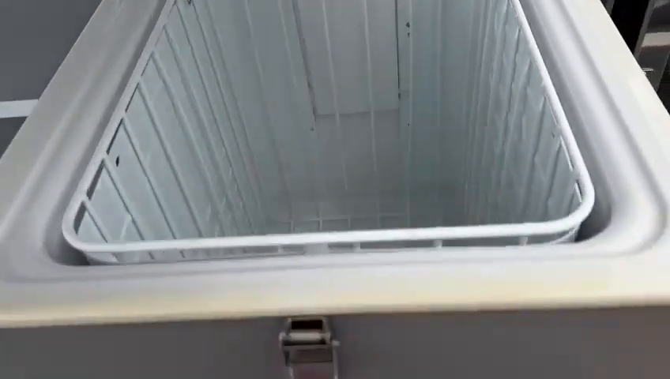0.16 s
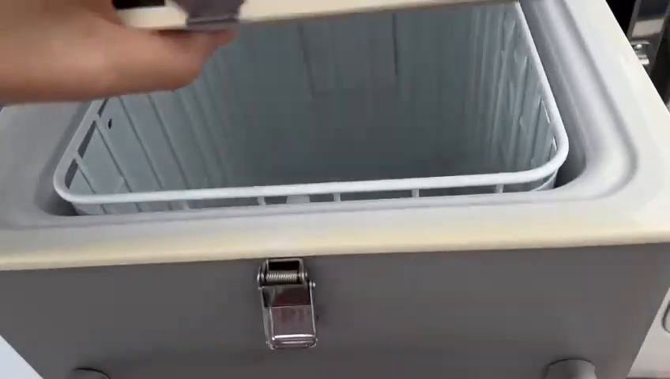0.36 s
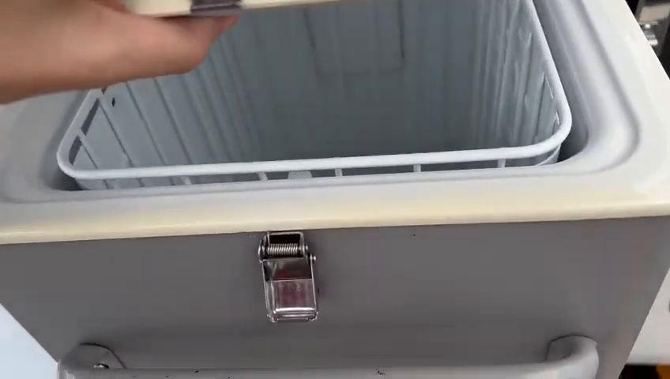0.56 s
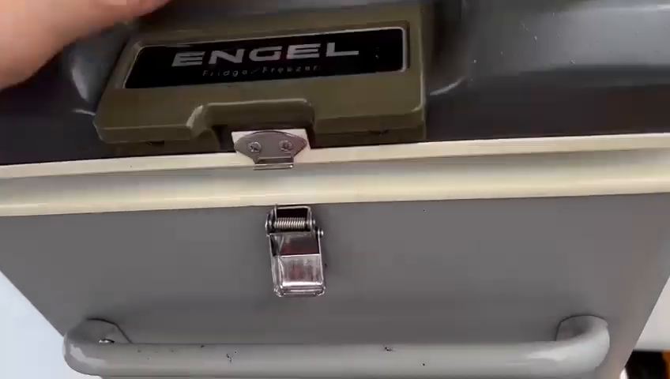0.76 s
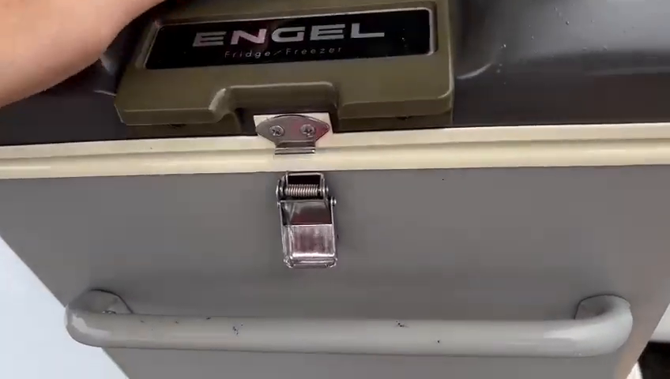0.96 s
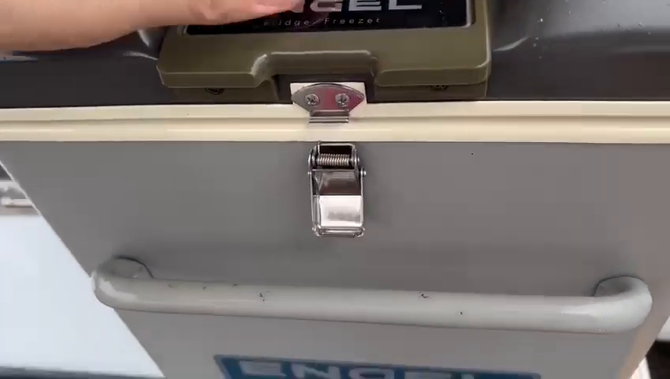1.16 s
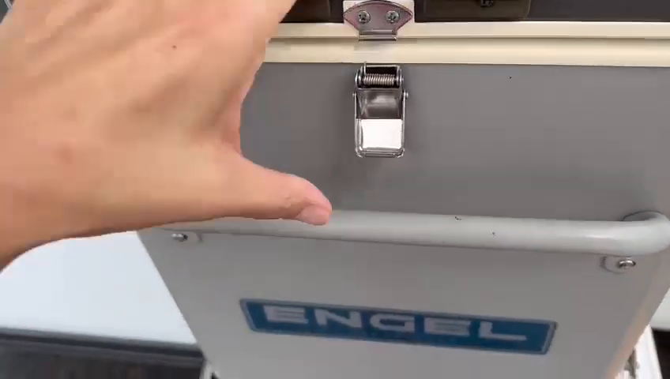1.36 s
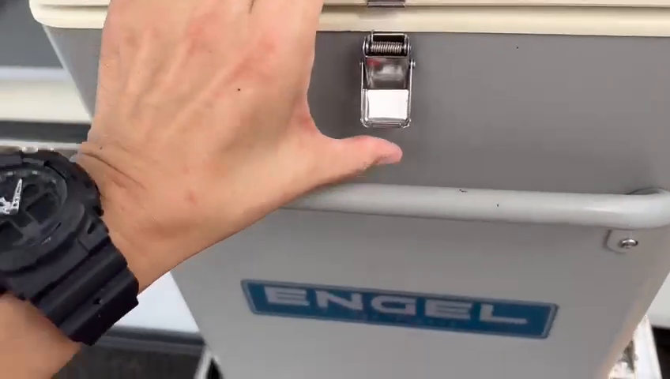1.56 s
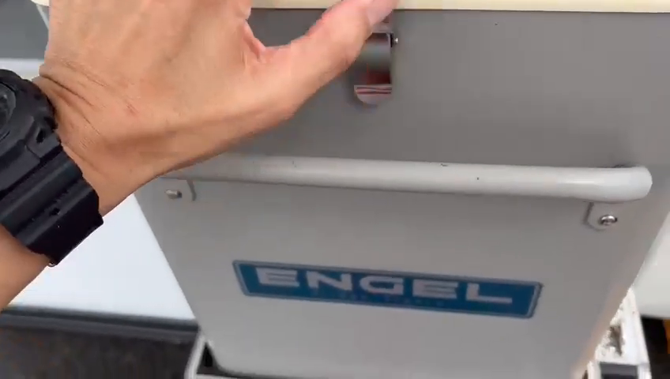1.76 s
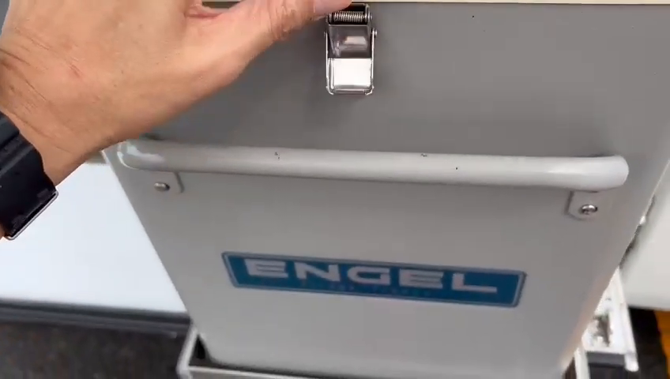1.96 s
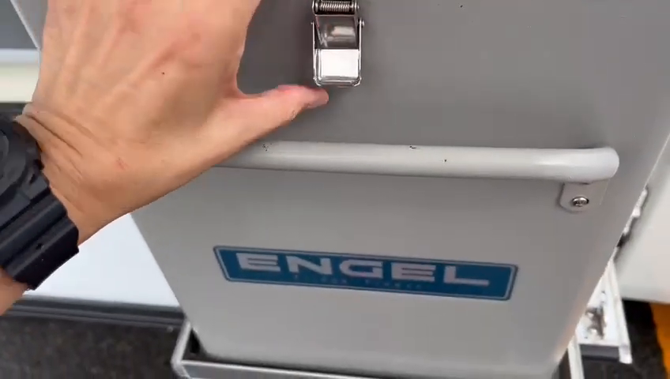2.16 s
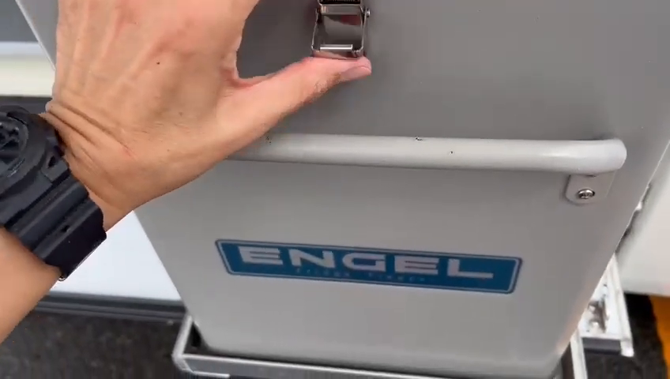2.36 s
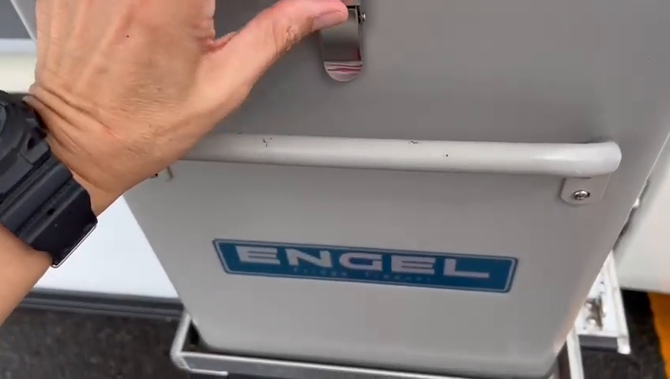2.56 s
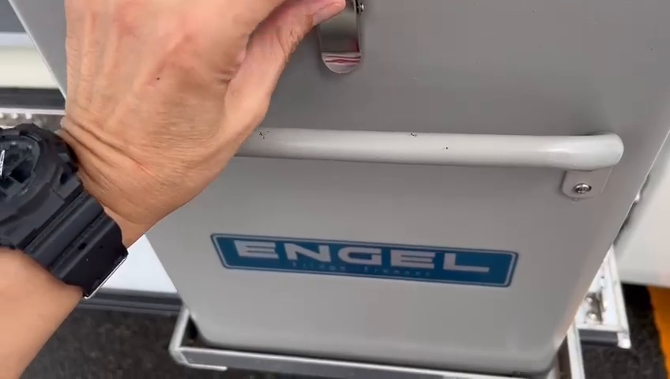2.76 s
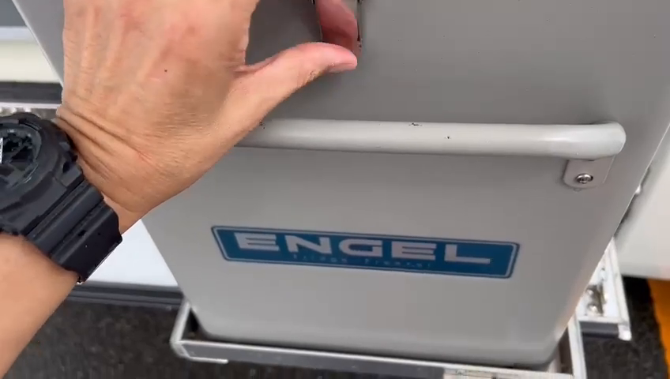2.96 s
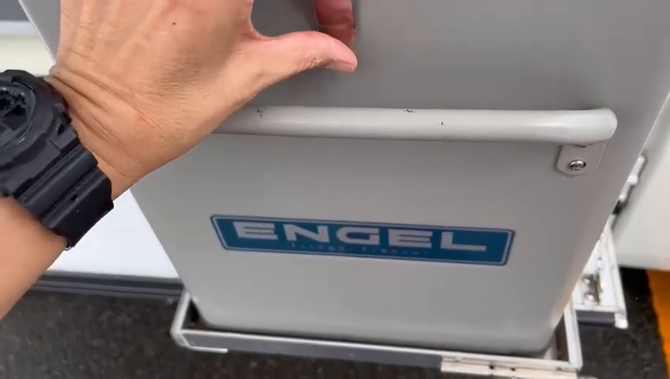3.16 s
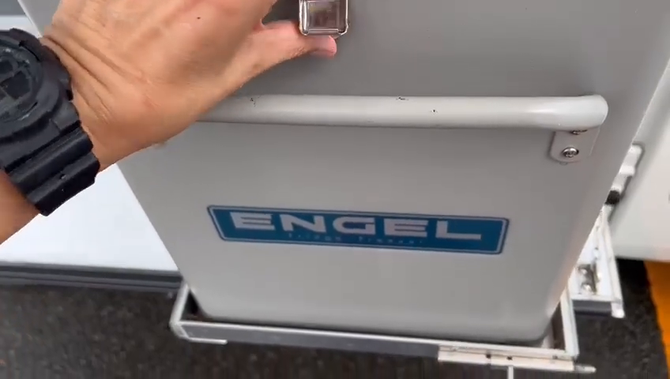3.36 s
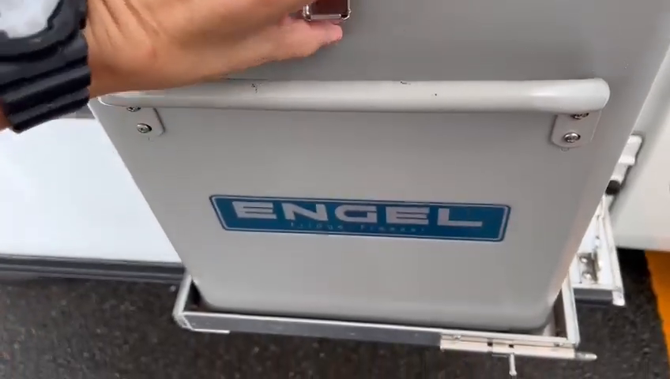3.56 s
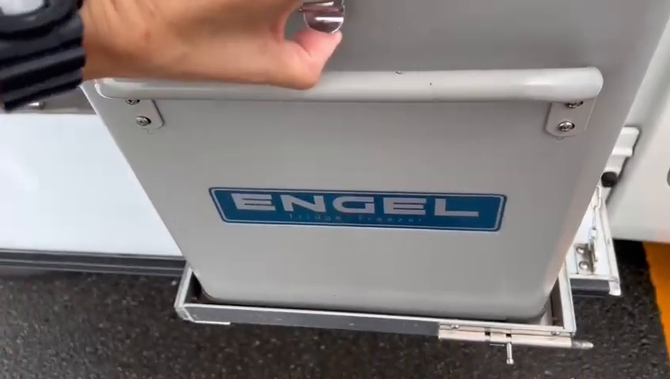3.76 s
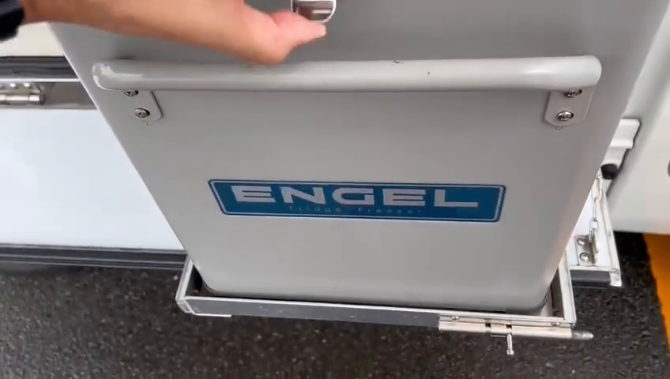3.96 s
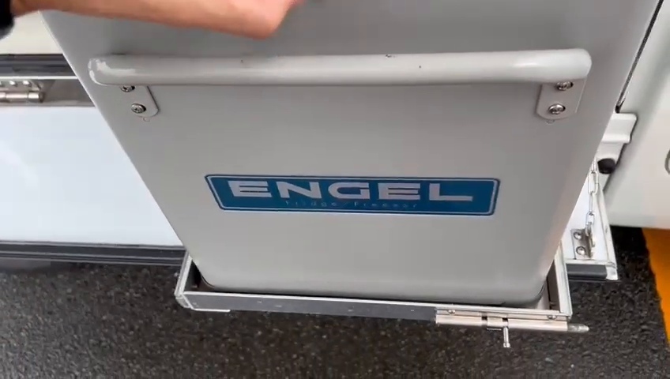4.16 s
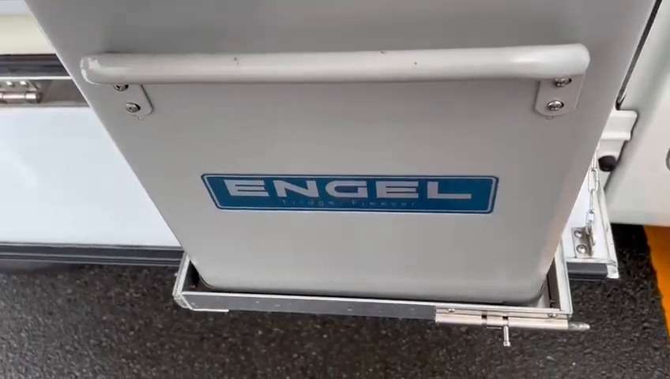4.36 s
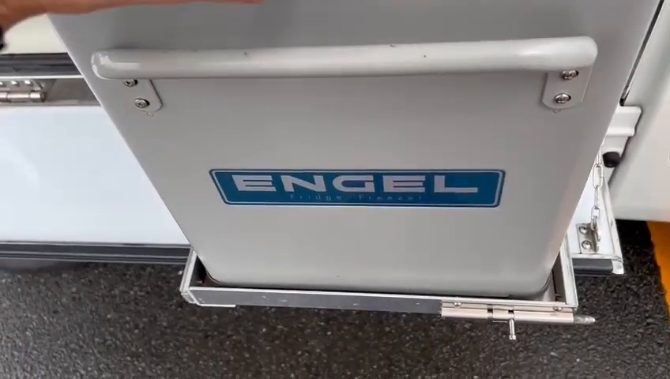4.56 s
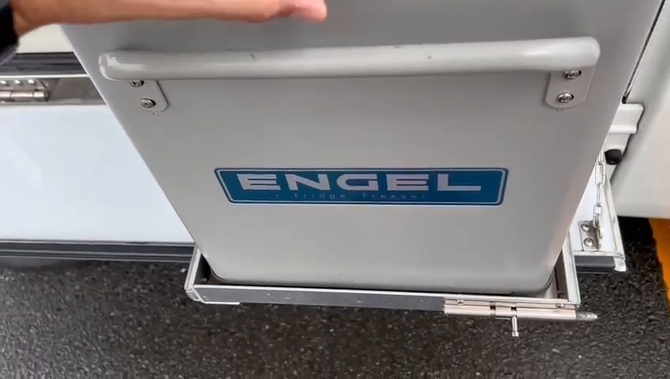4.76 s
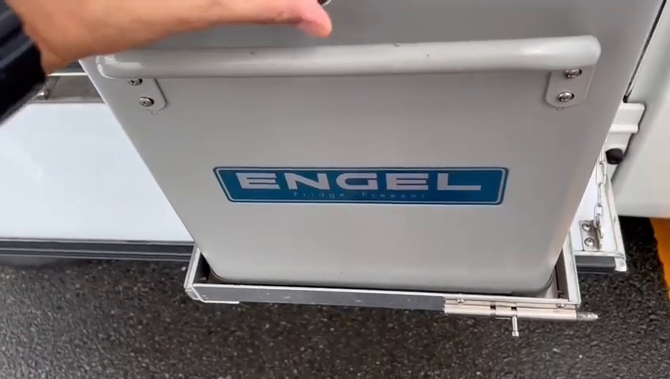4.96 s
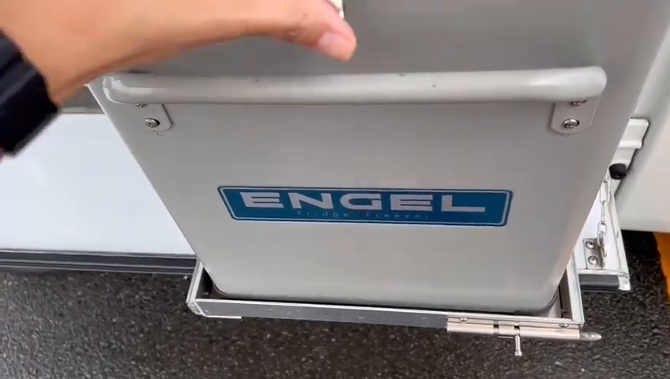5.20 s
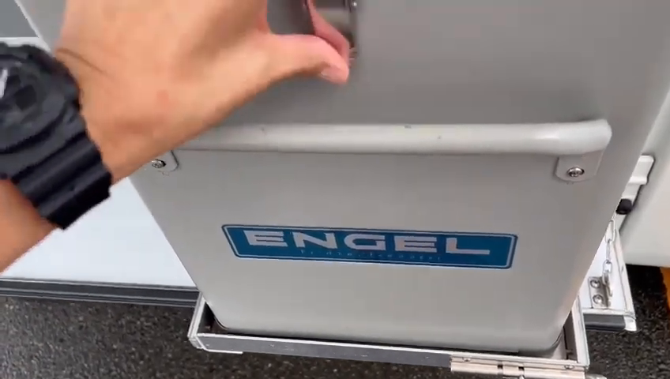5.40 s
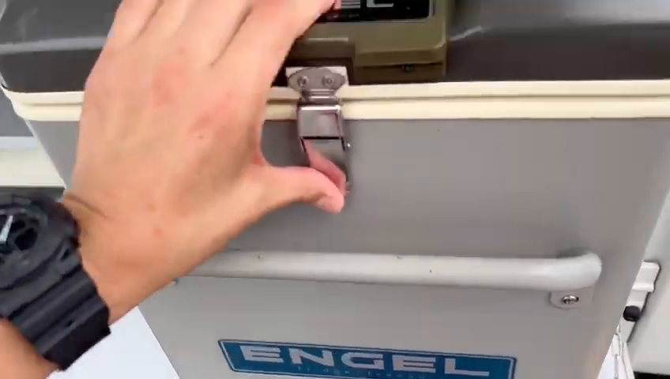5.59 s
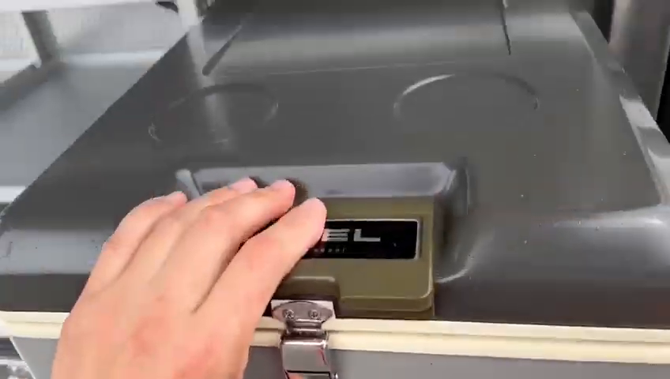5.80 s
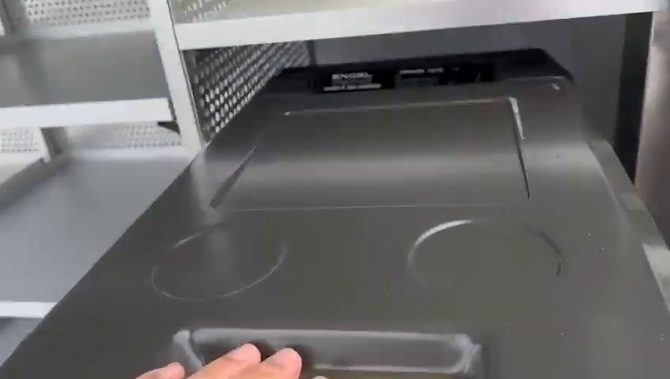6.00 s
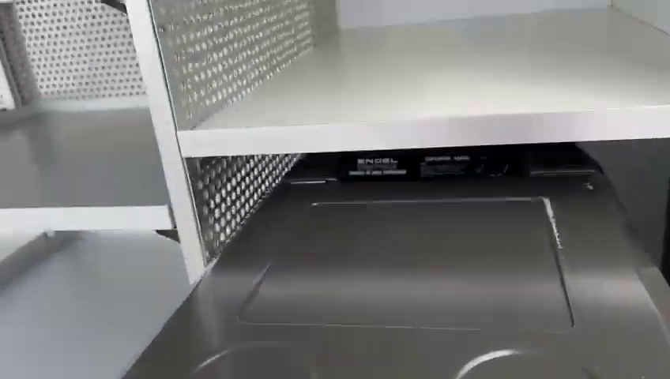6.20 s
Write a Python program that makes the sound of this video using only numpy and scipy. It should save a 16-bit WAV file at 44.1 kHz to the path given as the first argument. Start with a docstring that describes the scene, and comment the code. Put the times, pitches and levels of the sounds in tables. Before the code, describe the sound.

A heavy insulated lid falls shut, a cracking double thud with clattering hollow walls. Dry metallic clicks follow as a spring latch is flicked and fumbled, knocking the thin wall behind it, with tiny scrapes and skin rubbing. Clicks thin out, then one sharp snap and a low thump close it. Phone microphone held very near, stereo, short dense cabin echo, quiet low rumble and faint hiss beneath.

```python
"""Chest fridge lid and latch

The lid of a portable chest fridge drops shut and bounces once: falling booms, cracks and clattering walls.
A thumb fiddles with the steel latch, decaying modes that click, scrape and ring, and snaps it home with a thump.
Hands rub the plastic in grainy noise; a phone held close hears it through its two ports,
in a small hard cabin of dense echoes over a low rumble of filtered noise."""
import sys
import numpy as np
from scipy import signal
from scipy.fft import rfft, irfft
from scipy.io import wavfile
from scipy.ndimage import uniform_filter1d

SR = 44100
rng = np.random.default_rng(int(sys.argv[2]) if len(sys.argv) > 2 else 0)


def dump(signal):
    """Clip the signal to [-1, 1] and save it as 16-bit WAV at the path in sys.argv[1]."""
    limited = np.clip(np.atleast_2d(signal).T, -1, 1)
    pcm = np.round(limited * 32767).astype(np.int16)
    wavfile.write(sys.argv[1], SR, pcm)


N = 274963  # samples
t = np.arange(N) / SR
WIDE = np.array([[1], [-1]])  # opposite signs left and right
CHEST_PAN_DB, LATCH_PAN_DB = 2.0, 1.5  # left minus right
PORT_LAG = 11  # samples: the longer way round the phone to the left port


def undb(db):
    """Turns decibels into gain."""
    return 10 ** (np.asarray(db) / 20)


def unit(x):
    """Scales a sound to an RMS of 1."""
    return x / np.sqrt(np.mean(x ** 2))


def peak_one(x):
    """Scales a sound to a peak of 1."""
    return x / np.abs(x).max()


def decay(seconds, t60):
    """Exponential fall of 60 dB in t60 seconds."""
    return np.exp(-np.log(1000) * seconds / t60)


def on_log(hz, table):
    """Reads a (Hz, value) table on a log-frequency axis."""
    table_hz, values = np.transpose(table)
    return np.interp(np.log(np.maximum(hz, 1)), np.log(table_hz), values)


def coloured(x, table):
    """Shapes a sound by a (Hz, dB) spectrum."""
    n = x.shape[-1]
    hz = np.arange(n // 2 + 1) * SR / n
    return irfft(rfft(x) * undb(on_log(hz, table)), n)


def walk(rate):
    """Random levels held 1 / rate s and slewed twice; spread near 1."""
    hold = int(SR / rate)
    steps = np.repeat(rng.standard_normal(N // hold + 1), hold)
    return 0.76 * uniform_filter1d(uniform_filter1d(steps, hold), hold)[:N]


def burst(t60, size):
    """Noise that dies away."""
    return rng.standard_normal(size) * decay(np.arange(size) / SR, t60)


def ring(modes, size, scatter_db=0):
    """Sum of decaying modes after a sharp tap; peak 1."""
    hz, db, t60 = np.transpose(modes)[:, :, None]
    u = np.arange(size) / SR
    partials = undb(db + scatter_db) * decay(u, t60) * np.sin(2 * np.pi * hz * u)
    return peak_one(np.sum(partials, axis=0))


def clatter(modes, t60, hard_hz):
    """Modes shaken by a short rough contact instead of one clean tap; a softer one holds less treble; peak 1."""
    contact = signal.lfilter(*signal.butter(2, hard_hz, fs=SR), burst(t60, size=2048))
    return peak_one(signal.fftconvolve(modes, contact)[:len(modes)])


def add(out, s, y, db, pan_db):
    """Places a sound in the stereo picture, its last third faded out."""
    i = int(s * SR)
    fade = np.clip(np.linspace(3, 0, y.shape[-1]), 0, 1)
    y = (y * fade)[..., :N - i]
    out[:, i:i + y.shape[-1]] += y * undb(db + np.array([[pan_db], [-pan_db]]) / 2)


# a harder blow starts higher, falls faster and shakes more treble from the walls: (softest, hardest)
SWEEP_HZ, GLIDE_MS, CONTACT_HZ = (2.9, 540), (7.37, 2.38), (305, 980)
CRACK_RISE_S, BOOM_LAG_S = .0012, .0012
# walls and lid of the chest, modes: hz, level_db, t60_s
CHEST_MODES = [(127.5, -21, 0.13), (210, -3.5, 0.069), (175.3, -5.5, 0.14), (169, -12, 0.084),
               (260.6, -15, 0.11), (270.8, -6.5, 0.11), (336, -8.5, 0.041), (385.5, -14.5, 0.023),
               (442, -8.5, 0.027), (454.5, -7.5, 0.075), (495, -8.5, 0.052), (600, -4, 0.021),
               (670, -18, 0.038), (732, -9, 0.084), (993, -12, 0.056), (980, 1.5, 0.022),
               (1105, -1.5, 0.012), (1200, -21, .03), (1396, -23, 0.047), (1670, -24.5, .05),
               (2380, -19, .04), (2770, -34, .04)]
# blows on the chest: start_s, level_db, boom_hz, rise_ms, t60_s,
# and relative to level_db: walls_db, hardness (0-1), crack_db, rattle_db
BLOWS = [(0.067, -25.5, 75.4, 7.4, 0.06, -1, 0.06, -33, -40),
         (0.094, -20.5, 139, 0.69, 0.035, -14, 0, -39, -34),
         (0.163, -33.5, 160.5, 3.9, 0.1, -18, 0, -33, -49),
         (0.8126, -1, 102, 0.25, 0.069, -4.5, 1, -4.5, -15),
         (0.832, 0, 73, 3.4, 0.059, -22, 0.04, -31, -28.5),
         (0.852, -12.5, 111.8, 5.5, 0.16, -26, 0, -37.5, -31),
         (0.905, -5, 106.4, 4, 0.076, -9.5, 0.99, -4, -16.5),
         (.9105, -16, 297, 0.46, 0.016, 6.5, 1, -24, -15), (.922, -9.5, 63.6, 0.7, 0.32, -30, 0, -47, -51),
         (1.54, -22, 182.4, 8.5, 0.023, -13, .2, -24, -34),
         (1.553, -16, 61.8, 2.3, 0.028, -27, 0.1, -38, -49),
         (1.967, -18, 219.6, 1.1, 0.058, -3, 1, -8.5, -34),
         (4.293, -25, 197.6, 1.1, 0.092, -10, 1, -10, -10.5),
         (5.118, -39, 150, 3.1, 0.035, 3, 0.25, -24, -41),
         (5.24, -25, 216, 4.9, 0.065, -2.5, 0, -32.5, -43),
         (5.4005, -15, 147, 0.38, 0.25, -8.5, 0.77, -9, -21),
         (5.4054, -6, 47, 18, 0.064, -2, 0.7, -30.5, -17)]


def blows(size=16384):
    """Bending waves carry the treble first, so each thud falls in pitch to a boom; the walls clatter after it."""
    out, u = np.zeros((2, N)), t[:size]
    walls = ring(CHEST_MODES, size)
    for s, db, boom_hz, rise_ms, t60, walls_db, hard, crack_db, rattle_db in BLOWS:
        sweep_hz, glide_ms, hard_hz = (np.interp(hard, (0, 1), r) for r in (SWEEP_HZ, GLIDE_MS, CONTACT_HZ))
        hz = boom_hz + sweep_hz * np.exp(-1000 * u / glide_ms)
        swell = (1 - np.exp(-1000 * u / rise_ms)) ** 2 * decay(u, t60)
        boom = -np.sin(2 * np.pi * np.cumsum(hz) / SR) * swell / swell.max()
        shaken = clatter(walls, 0.03, hard_hz) + 0.3 * WIDE * clatter(walls, 0.028, hard_hz)
        add(out, s + BOOM_LAG_S, boom + undb(walls_db) * shaken, db, CHEST_PAN_DB)

        crack = coloured(burst(0.0066, size=8192),
                         [(700, -1), (2500, -9.5), (5800, 0), (8500, -15.5), (11000, -39.5)])
        rattle = coloured(burst(0.2, size=8192),
                          [(500, -12), (1500, -1), (4000, -9), (8500, -19.0), (11000, -40.5)])
        rise = np.clip(u[:len(crack)] / CRACK_RISE_S, 0, 1) ** 2
        add(out, s, peak_one(rise * crack), db + crack_db, CHEST_PAN_DB)
        add(out, s, rise * peak_one(rattle), db + rattle_db, CHEST_PAN_DB)
    return out


PLATE_DETUNE = 0.041  # spread as a share of pitch: random, so the plate sounds a little different in each click
KNOCK_DETUNE = 0.044  # likewise: random spread of the wall's pitches, so no two knocks sound the same
REBOUND_DB, REBOUND_S = -19, .035  # the loose parts chatter after a click: loudest one, span of delays
PING_DB = -10  # the ping against the edge noise
# steel latch, shaken modes: hz, level_db, t60_s
LATCH_MODES = [(2213, -13, 0.063), (2700, -28.5, 0.01), (3330, -17, 0.034), (4200, -31.5, .025),
               (5050, 5, 0.012), (5570, -8, 0.017), (6540, -8.5, 0.019), (7590, -26.5, 0.0086),
               (8085, -3.5, 0.032), (8400, -16, 0.028)]
# highest modes of the latch plate: hz, level_db, t60_s
PING_MODES = [(9600, -12.5, 0.048), (11000, -1, 0.0076)]
# wall under the latch, modes: hz, level_db, t60_s
WALL_MODES = [(468.7, 2, 0.13), (520, 2, 0.046), (680, 2, 0.041), (777, 0, 0.058), (930, -12.5, 0.038),
              (993.5, 4, 0.043), (1167, 7, 0.03), (1286, 4.5, 0.057), (1422, 0.5, 0.048)]
# latch clicks: start_s, level_db, knock_db (into the wall, relative), knock_hz (its centre), top_db (relative)
CLICKS = [(1.4024, -34.5, -4, 554, -9), (1.685, -33.5, -4, 690, 4), (1.745, -36.5, 9, 700, 0),
          (1.8268, -7, -5, 935, -1), (1.914, -37, -6, 751, -7.5), (1.9619, -7.5, -2.5, 690, 4.5),
          (2.021, -17.5, -3.5, 710, 2.5), (2.347, -31, -2, 681, -8), (2.442, -48, 22.5, 651, -5),
          (2.469, -35.5, -22, 748, 7), (2.4823, -25.5, -28, 673, 8), (2.524, -7.5, -9, 1020, -15),
          (2.572, -33, -21, 696, 7), (2.584, -29.5, 3, 700, 2), (2.595, -6, -8, 1060, 2),
          (2.7561, -37, 0, 670, -3), (2.798, -35.5, -4, 1324, -13.5), (2.8654, -25.5, -7, 1008, -8),
          (2.975, -57, 11.5, 700, -22), (3.004, -64, 11, 800, -17), (3.031, -15, -10, 990, -4),
          (3.208, -42.5, 7, 670, -11), (3.3288, -37, -21, 694, -1), (3.3487, -39, -26, 746, -2),
          (3.371, -21.5, -2, 664, 6), (3.4435, -38, -3, 757, -11), (3.611, -30, -4, 682, -0.5),
          (3.648, -57, 16, 900, -24), (3.7, -24.5, -3.5, 660, 2), (3.7872, -37, 2.5, 668, 3),
          (4.277, -31, -0.5, 1300, -1), (4.3874, -8, -12.5, 1030, -0.5), (4.556, -46, 1, 1520, -11),
          (4.576, -26.5, -7, 977, -14), (4.811, -27.5, -18, 497, -9), (4.8399, -44.5, 13.5, 1080, -16),
          (4.94, -47, -10, 1400, -31), (5.0689, -30, -17.5, 1340, -11), (5.095, -52, 13, 1200, -17),
          (5.233, -38, 4.5, 1310, -11), (5.268, -54, -9, 1300, -12), (5.283, -51, -4, 1000, -12),
          (5.304, -35, -0.5, 496, -23), (5.322, -44, 1.5, 900, -19), (5.4038, -9, -10, 1300, 5.5),
          (5.805, -60, 19.5, 900, -19.5)]


def latch(size=6144):
    """Steel on steel: a crack, short modes, a few rebounds and a knock into the wall behind.
    The middle range leaves the plate unevenly and differs at the two ports; the top reaches both alike."""
    steel, walls = np.zeros((2, 2, N))
    plate_count, wall_count = len(LATCH_MODES), len(WALL_MODES)
    scatter = rng.standard_normal((len(CLICKS), 2 * plate_count + 2 * wall_count, 1))
    rebounds = rng.random((len(CLICKS), 2, 4))
    rise = np.clip(t[:size] / 0.0045, 0, 1) ** 3  # soft onset: each click swells over 4.5 ms
    ping = ring(PING_MODES, size)
    for (s, db, knock_db, knock_hz, top_db), chance, (when, strength) in zip(CLICKS, scatter, rebounds):
        plate_level, plate_pitch, wall_level, wall_pitch = np.split(
            chance, [plate_count, 2 * plate_count, 2 * plate_count + wall_count])
        edge = coloured(burst(0.026, size), [(5000, -25.0), (7500, -7.0), (9300, 7),
                                             (10000, -9), (11600, -0.5), (12400, -36.5)])
        noise = np.array([burst(0.034, size) + 0.25 * burst(0.13, size) for _ in range(2)])
        crack = coloured(noise, [(900, -2.5), (2000, -1.0), (7000, -1.5), (9300, -24.5), (10000, -24.5)])
        plate = np.array(LATCH_MODES) * (1 + PLATE_DETUNE * plate_pitch * [1, 0, 0])
        plate = ring(plate, size, 3 * plate_level)
        shaken = np.array([clatter(plate, 0.01, 19000) for _ in range(2)])
        middle = 0.85 * peak_one(crack) + 0.9 * shaken
        top = undb(top_db) * (peak_one(edge) + undb(PING_DB) * ping)

        train = np.zeros((1, size))  # the click itself, then weaker rebounds
        rebound_at = (SR * (.006 + REBOUND_S * when)).astype(int)
        train[0, rebound_at] = undb(REBOUND_DB - 24 * when - 6 * strength)
        train[0, 0] = 1
        click = signal.fftconvolve(rise * (middle + top), train, axes=1)[:, :size]
        add(steel, s - .003, click, db, LATCH_PAN_DB)

        near_db = -24 * np.abs(np.log2(np.array(WALL_MODES)[:, :1] / knock_hz))  # the struck spot favours some
        wall = np.array(WALL_MODES) * (1 + KNOCK_DETUNE * wall_pitch * [1, 0, 0])
        wall = ring(wall, size, near_db + 2 * wall_level)
        knock = clatter(wall, 0.029, 3200) + 0.19 * WIDE * clatter(wall, 0.021, 3600)
        add(walls, s - .003, rise * knock, db + knock_db, LATCH_PAN_DB)
    steel[0] = np.roll(steel[0], PORT_LAG)
    return steel + signal.lfilter(*signal.butter(2, 350, "high", fs=SR), walls)  # a small knock moves no bass


RING_HZ, RING_WAVER_HZ, RING_WAVER_DB = 9082, 40, 3.5  # centre pitch, spreads of its pitch and level
# thin ring of the wire loop, until the thumb or the catch stops it: start_s, level_db, t60_s, stopped_after_s
RINGS = [(1.8263, -25.5, 0.13, 0.11), (1.966, -31, 0.19, 0.038), (2.023, -49, .05, .02),
         (2.485, -26, .1, 0.043), (2.5235, -25, 0.14, 0.047), (2.595, -30, 0.042, .035),
         (3.37, -26, .08, 0.013), (3.383, -25, 0.054, 0.022), (3.444, -46, .05, 0.01)]


def loop(size=8192):
    """One high mode that wavers a little in pitch and strength and is cut short by a touch."""
    out, u = np.zeros((2, N)), t[:size]
    hz = RING_HZ + RING_WAVER_HZ * walk(150)
    tone = np.sin(2 * np.pi * np.cumsum(hz) / SR) * undb(RING_WAVER_DB * walk(200))
    for s, db, t60, stop_s in RINGS:
        touch = np.clip(np.minimum(u / .002, (stop_s - u) / 0.0046), 0, 1)
        add(out, s, touch * decay(u, t60), db, LATCH_PAN_DB)
    return np.array([np.roll(out[0] * tone, PORT_LAG), out[1] * tone])


# steel dragged over steel or plastic, a string of tiny knocks: start_s, end_s, knocks_per_s, level_db,
# wall_db (knock into the wall, relative), spot_hz (pitch of the rubbed spot), spot_db (relative)
SCRAPES = [(1.906, 1.96, 1300, -43.5, -7, 700, 0), (2.443, 2.52, 1320, -41, -7, 750, 11),
           (3.32, 3.41, 1540, -46, -7, 700, 5), (4.25, 4.37, 900, -48, 0.5, 1300, 7),
           (4.805, 4.92, 190, -57.5, 5, 1110, 10), (5.072, 5.14, 440, -65, 8, 1300, 16),
           (5.257, 5.35, 240, -65, 10, 1400, 10), (.01, .1, 860, -60, 14, 1000, 8),
           (.28, .35, 800, -58, 18, 1750, 8), (.68, .78, 420, -67, 14, 1100, 8),
           (1.075, 1.213, 490, -52, 0, 1200, 8), (5.403, 5.452, 700, -41.5, 7, 900, 11.5)]


def scrapes(size=1024):
    """Uneven knocks, a few much stronger, shake plate and wall for a moment each; the touch damps both."""
    steel, walls, spot = np.zeros((3, N))
    luck = rng.random(N)
    strength_db = 3.0 * np.clip(rng.exponential(size=N), 0, 3) + 3.0 * walk(60)
    knocks = rng.standard_normal(N) * undb(strength_db)
    for start, end, per_s, db, wall_db, spot_hz, spot_db in SCRAPES:
        fade = np.clip(np.minimum(t - start, end - t) / 0.032, 0, 1)
        drag = fade * (luck < per_s / SR) * knocks * undb(db)
        steel += drag
        walls += drag * undb(wall_db)
        spot += undb(spot_db) * signal.lfilter(*signal.iirpeak(spot_hz, 6.0, fs=SR), drag)
    grit_colour = [(1200, -12), (2500, -4), (8500, 3), (9500, -16.5), (12000, -29.5)]
    grit = np.array([coloured(burst(.006, size), grit_colour) for _ in range(2)])
    damped = [1, 1, .3]  # shortens each t60
    plate = .6 * ring(np.array(LATCH_MODES) * damped, size) + grit
    wall = ring(np.array(WALL_MODES) * damped, size)
    scraped_steel = signal.fftconvolve(steel[None], plate, axes=1)[:, :N]
    return scraped_steel + signal.fftconvolve(walls, wall)[:N] + spot


# the more the dull part outweighs the hiss, the deeper it sounds: pitch at equal levels, dB per octave
DULL_HZ, DULL_OCTAVE_DB = 880, 18
# spectrum of the rubbing hiss: hz, level_db (per Hz)
RUB_COLOUR = [(800, -22.5), (1300, -3), (1700, -4.5), (2500, -9), (4500, -11), (6500, -9.5), (8800, -13),
              (9600, -48), (11300, -23.5), (12300, -39)]
# hands, cloth and latch scuffing: start_s, end_s, fade_in_share (0-1), hiss_db, dull_db
SCUFFS = [(0, 0.122, 0.37, -49, -43.5), (0.268, 0.364, 0.42, -47.5, -43), (0.479, 0.522, 0.072, -72, -56),
          (0.657, 0.86, 0.37, -58.5, -50.5), (.86, 0.937, 1, -41.5, -39), (0.945, 1.044, 0.068, -54.5, -46),
          (1.038, 1.245, 0.42, -52, -44.5), (1.225, 1.562, 0.1, -64.5, -56.5),
          (1.499, 1.548, .2, -54.5, -58), (1.673, 1.856, 1, -56, -48.5), (1.92, 1.988, 1, -50.5, -41.5),
          (1.956, 2.074, 0.082, -52.5, -37.5), (2.094, 2.246, 0.29, -62, -55.5),
          (2.405, 2.574, 0.6, -60, -42), (2.514, 2.58, 0.65, -61, -46), (2.742, 2.838, 0.13, -66, -64),
          (2.874, 3.066, 1, -71, -59.5), (3.288, 3.411, 0.83, -58, -48), (3.772, 3.886, 0.085, -69, -52.5),
          (4.087, 4.183, 0.37, -63.5, -64), (4.25, 4.352, 0.52, -51, -45.5), (4.42, 4.625, 0.25, -64, -54),
          (4.798, 4.926, 0.16, -77, -45), (5.046, 5.22, 0.22, -64, -76), (5.209, 5.386, 0.087, -59, -73),
          (5.364, 5.4, 1, -44.5, -39), (5.395, 5.764, 0.033, -77, -44.5), (5.907, 6.363, 1, -63, -42)]


def rubbing():
    """Skin, cloth and steel slip in tiny grains; the rubbed wall adds a dull colour, more alike at both ports."""
    grain_db = 3.0 * np.clip(rng.exponential(size=(4, N)), 0, 6)
    grains = rng.standard_normal((4, N)) * undb(grain_db)
    hiss_gain, dull = np.zeros(N), np.zeros((2, N))
    for start, end, share, db, dull_db in SCUFFS:
        dull_hz = DULL_HZ * 2 ** ((db - dull_db) / DULL_OCTAVE_DB)
        span = slice(max(int(start * SR), 0), int(end * SR))
        top = start + np.clip(share, .05, .95) * (end - start)
        shape = np.sin(np.pi / 2 * np.interp(t[span], [start, top, end], [0, 1, 0]))
        hiss_gain[span] += undb(db) * shape
        wall = signal.butter(1, [dull_hz / 2.41, dull_hz * 1.85], "band", fs=SR)
        muffled = signal.lfilter(*wall, signal.lfilter(*wall, grains[2:, span]))
        dull[:, span] += undb(dull_db) * shape * unit(muffled)
    mid, side = (unit(coloured(g, RUB_COLOUR)) for g in grains[:2])
    hiss = hiss_gain * (mid + 0.99 * side * WIDE)
    uneven = undb(4.1 * np.clip(walk(110), -2, 2))  # the grip catches and lets go
    return uneven * (hiss + dull[0] * undb([[.8], [-.8]]) + 0.4 * dull[1] * WIDE)


SHUDDER_ATTACK_S, SHUDDER_RELEASE_S = 0.037, 0.058
# shudders of the lid and chest, near tones: start_s, end_s, first_hz, last_hz, level_db
SHUDDERS = [(0.687, 0.762, 165, 120, -29.5), (0.741, 0.83, 146, 146, -29.5), (.825, 0.897, 493, 463, -19.5),
            (5.43, 5.48, 475, 426, -25), (5.48, 5.6, 49.6, 49.4, -21.5), (5.589, 5.756, 50.6, 47.2, -23.5),
            (5.505, 5.771, 359, 361, -50)]


def shudders():
    """Panels shake at their own pitch while the lid or a hand loads them."""
    out = np.zeros(N)
    for start, end, first_hz, last_hz, db in SHUDDERS:
        fade = np.clip(np.minimum((t - start) / SHUDDER_ATTACK_S, (end - t) / SHUDDER_RELEASE_S), 0, 1)
        hz = np.interp(t, (start, end), (first_hz, last_hz)) * (t > start)
        out += fade * np.sqrt(2) * undb(db) * np.sin(2 * np.pi * np.cumsum(hz) / SR)
    return out * undb([[.6], [-.6]])


TICKS_PER_S, TICK_DB = 8, -54  # average rate, level of the softest


def ticks(size=1024):
    """Faint stray creaks at random moments: short dull noises, each around its own pitch."""
    out = np.zeros((2, N))
    rise = np.clip(t[:size] / 0.0028, 0, 1)
    for when, strength, pitch, side in rng.random((int(TICKS_PER_S * N / SR), 4)):
        hz = 550 * 2 ** (1.3 * pitch)
        creak = coloured(burst(.03, size), [(hz / 2, -25), (hz, 0), (hz * 2, -22), (5000, -60)])
        add(out, when * N / SR, rise * peak_one(creak), TICK_DB + 10 * strength, 6 * side - 2)
    return out


# spectrum of the low rumble: hz, level_db (per Hz)
RUMBLE_COLOUR = [(12, -68.5), (20, -52), (34, 0), (54, 4), (68, 3.5), (87, -13.5), (145, -7.5),
                 (184, -17.5), (239, -13.5), (400, -32), (520, -26), (880, -120)]
# spectrum of the faint hiss: hz, level_db (per Hz)
HISS_COLOUR = [(200, -15), (350, 10.5), (800, -6), (2000, -5.5), (2600, -17.5), (7500, -13), (8800, -23),
               (9500, -49)]
# air of the cabin, levels over time: time_s, hiss_db, rumble_db
AIR = [(0, -60.5, -38.5), (0.599, -67.5, -48.5), (1.202, -57, -34.5), (2.2, -64.5, -45.5),
       (3.499, -64.5, -44), (4.7, -66.5, -44.5), (5.3, -62, -42), (5.899, -62.5, -41.5), (6.23, -85, -41.5)]


def rumble():
    """Wavering low noise, nearly the same at both ports, and a faint smooth hiss."""
    s, hiss_db, rumble_db = np.transpose(AIR)
    low, low_side = (unit(coloured(rng.standard_normal(N), RUMBLE_COLOUR)) for _ in range(2))
    hiss, hiss_side = (unit(coloured(rng.standard_normal(N), HISS_COLOUR)) for _ in range(2))
    swell = undb(np.interp(t, s, rumble_db) + 2.6 * walk(4.6))
    faint = undb(np.interp(t, s, hiss_db) + 0.88 * walk(58))
    low_noise = swell * (low * undb([[.7], [-.7]]) + .1 * low_side * WIDE)
    return low_noise + faint * (hiss + .5 * hiss_side * WIDE)


CABIN_DB = -12  # energy of the echo pattern
# decay of the cabin: hz, t60_s
CABIN_T60 = [(100, 0.57), (400, 0.29), (900, 0.15), (2000, 0.02), (8000, 0.088)]


def cabin(dry, size=16384):
    """Dense echoes by octave, each dying at its own rate; the bass echo is weak and mostly shared by both ports."""
    tail = np.zeros((2, size))
    for hz in 60 * 2. ** np.arange(8):
        band = [(hz / 2, -40), (hz / 1.7, -3), (hz, 0), (hz * 1.5, -3), (hz * 2, -40)]
        mid, side = (coloured(burst(on_log(hz, CABIN_T60), size), band) for _ in range(2))
        tail += min(hz / 400, 1) * (mid + min(hz / 1200, 1) * side * WIDE)
    tail *= 1 - np.exp(-np.arange(size) / SR / 0.003)  # soft onset
    tail *= np.clip(np.linspace(3, 0, size), 0, 1)
    tail /= np.sqrt(np.sum(tail ** 2) / 2)
    return undb(CABIN_DB) * signal.fftconvolve(dry.mean(axis=0)[None], tail, axes=1)[:, :N]


def scene():
    """Sums the layers; the blows, clicks, scrapes and ticks also feed the cabin echo."""
    hits = blows() + latch() + scrapes() + ticks()
    return hits + cabin(hits) + loop() + rubbing() + shudders() + rumble()


BASS_CUT_HZ, TOP_HZ = 44, 12600


def record(dry):
    """The phone drops the deepest bass, clips peaks beyond full scale and cuts the top."""
    bass_cut = signal.butter(2, BASS_CUT_HZ, "high", fs=SR, output="sos")
    top_cut = signal.ellip(8, .2, 60, TOP_HZ, fs=SR, output="sos")
    thin = signal.sosfilt(bass_cut, dry)
    return signal.sosfilt(top_cut, np.clip(thin, -1, 1))


dry = scene()
out = record(dry)
dump(out)
```